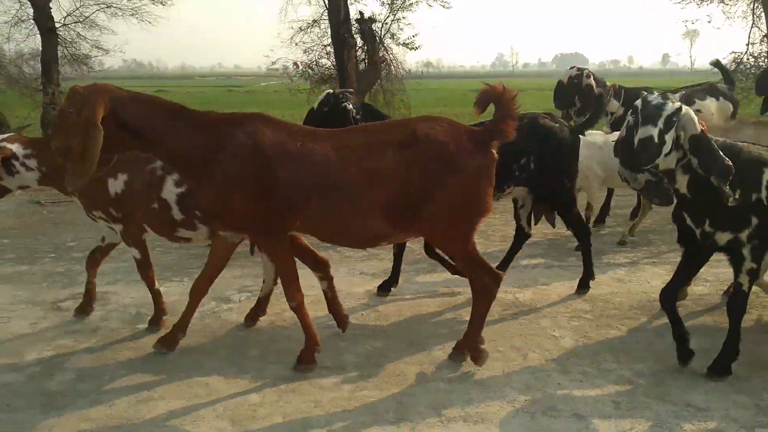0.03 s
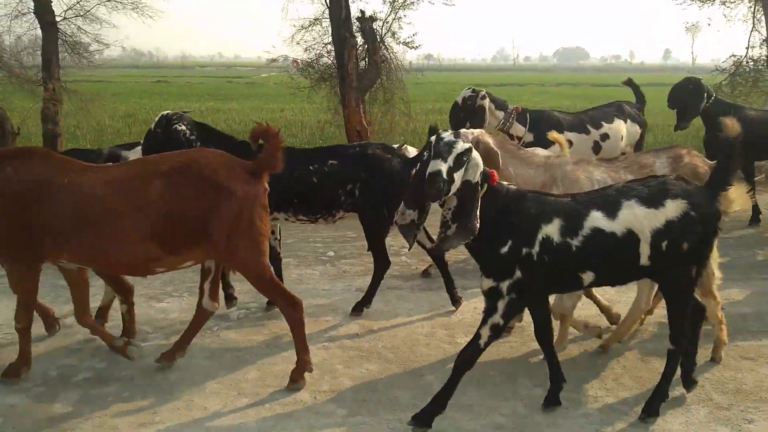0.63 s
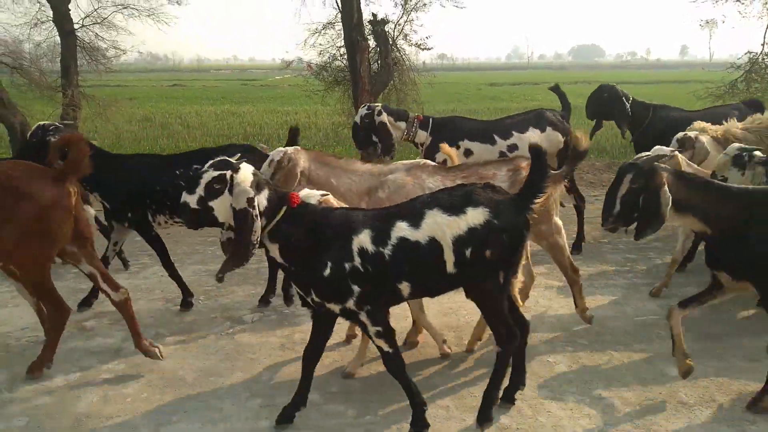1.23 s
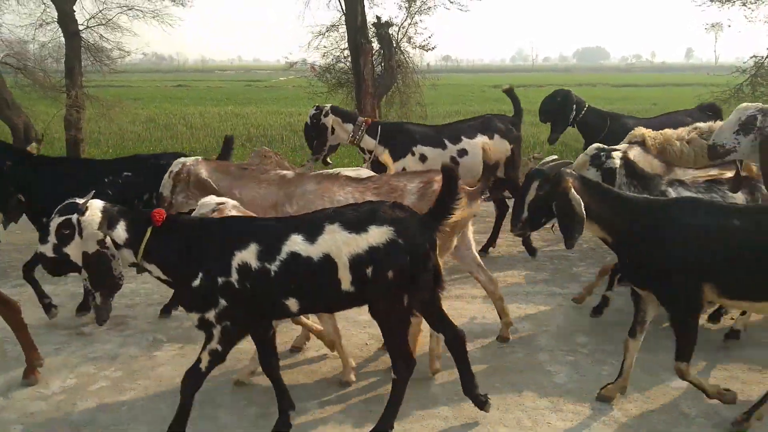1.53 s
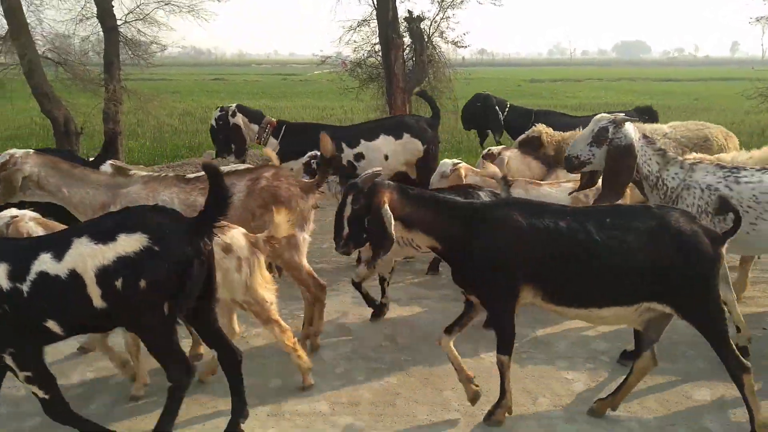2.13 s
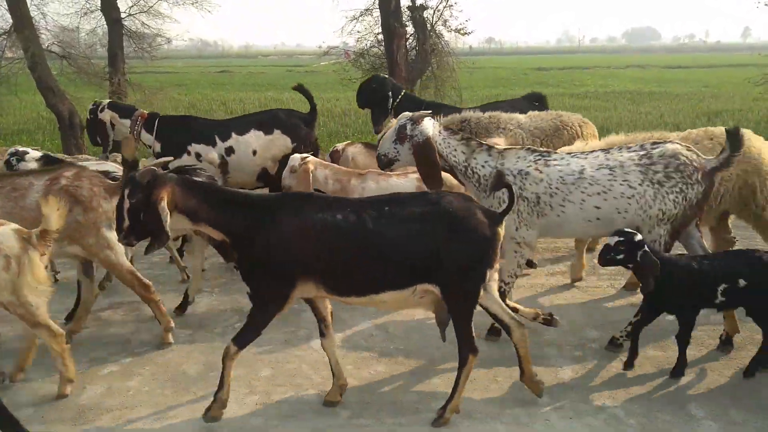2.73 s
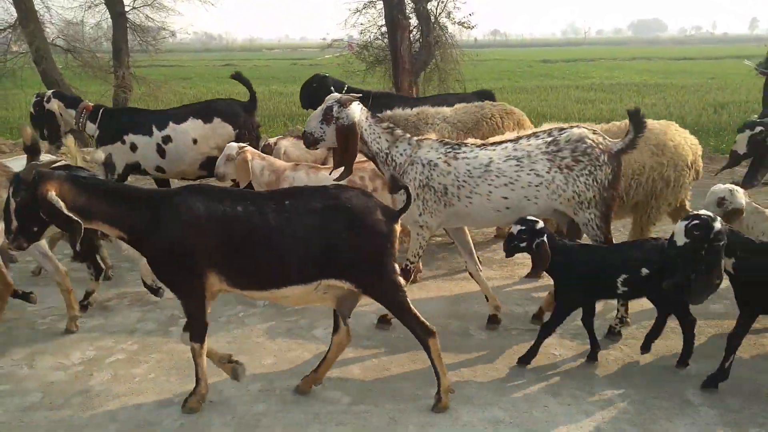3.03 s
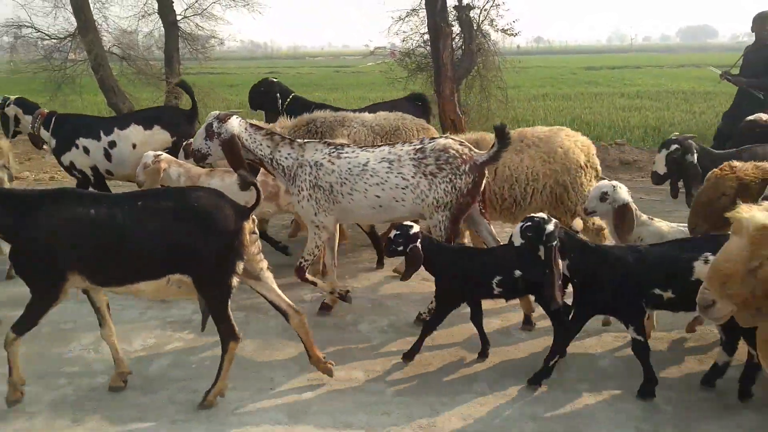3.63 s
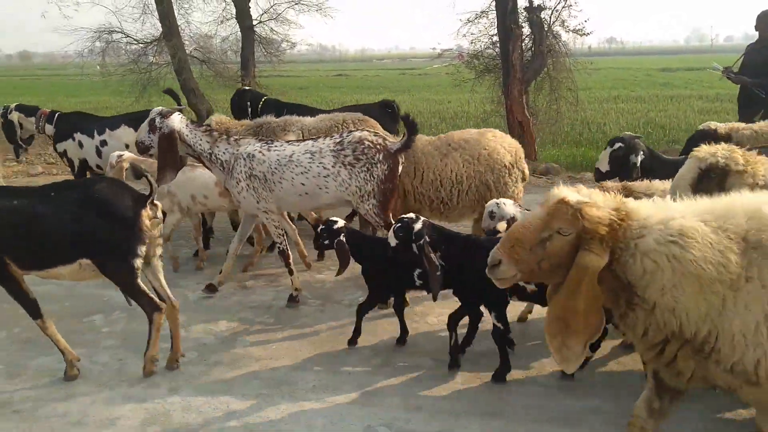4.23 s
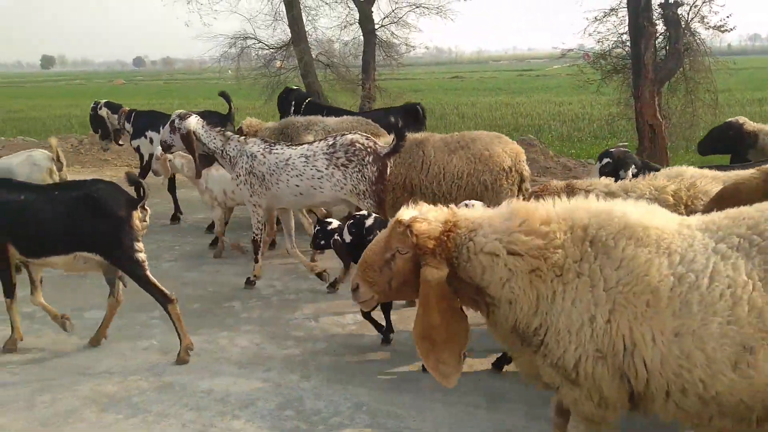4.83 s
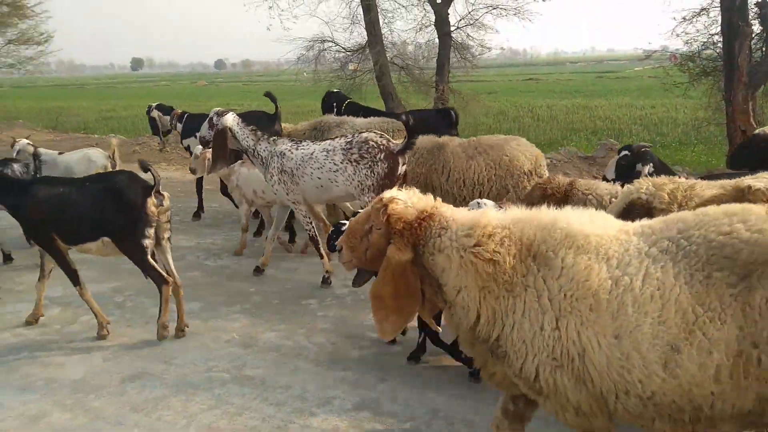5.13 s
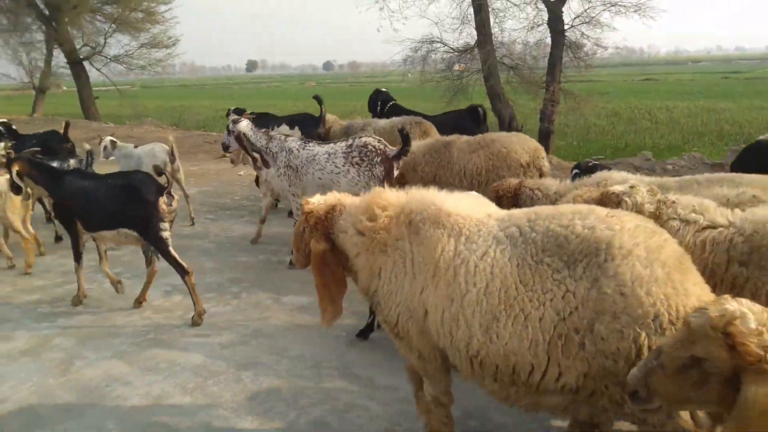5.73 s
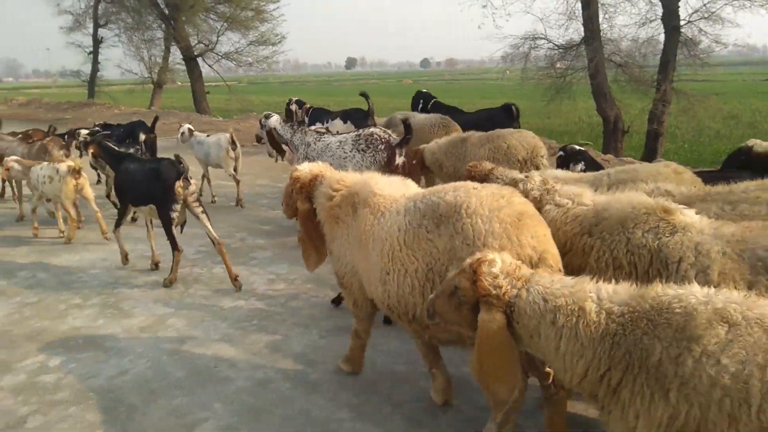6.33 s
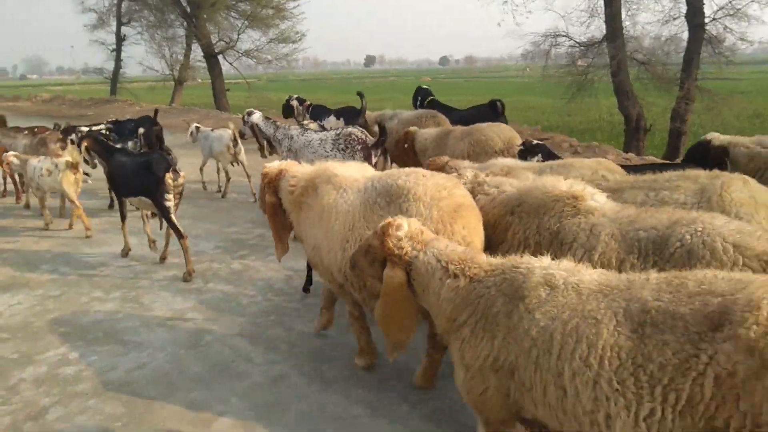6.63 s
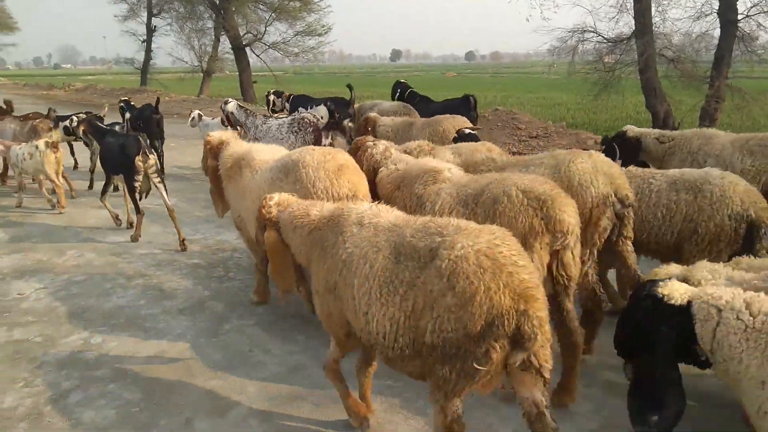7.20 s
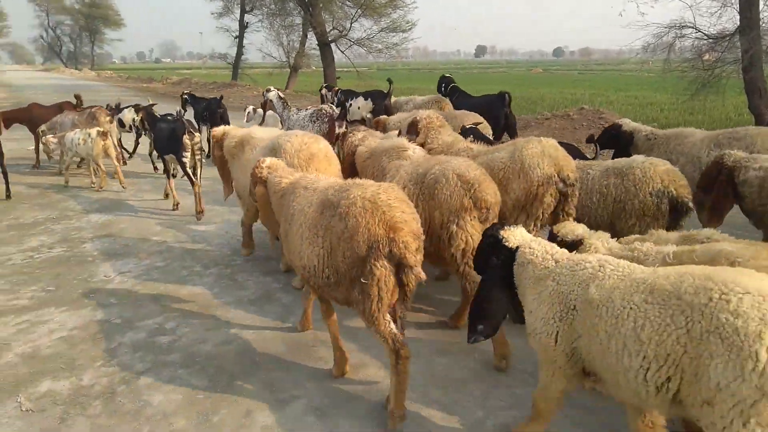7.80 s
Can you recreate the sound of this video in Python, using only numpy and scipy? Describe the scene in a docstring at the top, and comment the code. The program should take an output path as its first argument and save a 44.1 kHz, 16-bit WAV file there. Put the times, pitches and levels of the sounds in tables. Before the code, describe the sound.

Small collar bells clack and jingle as goats and sheep walk past on a gritty road, with strong wind buffeting the microphone later.

```python
"""Three pellet bells clack and ring on the collars of goats and sheep passing on a gritty paved road.
Each pellet hit rings the shell; in the large and small bells it also pumps the enclosed air: a clack.
Hooves tick, scuff and drag through the dust. Wind eddies buffet two microphone ports, the right one
muffled; from 5 s the breeze blows straight into the left. A faint, far whistle near the end."""
import sys
import numpy as np
from scipy import signal
from scipy.fft import rfft, irfft
from scipy.io import wavfile
from scipy.ndimage import uniform_filter1d

SR = 44100
rng = np.random.default_rng(int(sys.argv[2]) if len(sys.argv) > 2 else 0)


def output_pcm(signal):
    """Save a mono or channel-first signal as 16-bit PCM at the path in sys.argv[1].

    Samples are clipped to [-1, 1] before scaling.
    """
    pcm = np.clip(np.atleast_2d(signal).T, -1, 1) * 32767
    wavfile.write(sys.argv[1], SR, np.round(pcm).astype(np.int16))


N = 351036
TIME = np.arange(N) / SR

# Table levels are relative; the functions add their own gains.
# large bell, pellet hits: t/s, clack/dB, ring/dB, overtones/dB
LARGE_HITS = [(0.325, -50, -82, -90), (0.553, -40, -59, -58.5), (0.721, -65, -58, -60.5),
              (0.838, -37, -61, -61), (1.053, -46, -55, -60), (1.44, -40.5, -68, -63),
              (1.646, -37, -68, -72), (1.913, -43, -49.5, -66), (2.024, -39.5, -63, -67),
              (2.125, -35.5, -58, -64), (2.257, -23.5, -55, -61), (2.393, -31.5, -41.5, -63),
              (2.985, -30.5, -80, -71), (3.086, -32, -65, -66), (3.235, -50, -55, -70),
              (3.375, -43, -50, -67), (3.454, -36, -50, -53), (3.541, -46, -73, -56),
              (3.649, -36.5, -66, -63), (3.799, -38, -70, -86), (3.888, -32, -57, -61),
              (4.039, -51, -41.5, -64), (4.189, -36, -47.5, -61), (4.253, -52, -57.5, -55),
              (4.378, -45, -66, -56), (4.585, -38.5, -56, -67), (4.685, -36, -53.5, -82),
              (4.822, -35, -59.5, -60), (4.981, -32, -59, -67), (5.069, -64, -53, -85),
              (5.427, -43, -49, -68), (5.484, -29, -54, -55), (5.564, -45, -61, -60),
              (5.647, -51, -51.5, -92), (5.732, -46, -58, -76), (5.868, -40, -80, -65),
              (6.211, -34.5, -58, -79), (6.299, -27, -63, -55), (6.416, -37, -55.5, -83),
              (6.497, -43.5, -76, -82), (6.613, -40, -52.5, -64), (6.995, -29.5, -60.5, -70),
              (7.066, -32.5, -73, -52), (7.201, -47.5, -71, -74), (7.435, -39.5, -82, -62),
              (7.478, -44, -59, -58), (7.636, -33.5, -57.5, -58), (7.746, -48, -73, -84)]
# middle bell, pellet hits: t/s, ring/dB, overtones/dB
MIDDLE_HITS = [(0.914, -59, -72), (1.645, -61, -59), (2.893, -55, -71), (3.003, -71, -64),
               (3.294, -66, -61), (3.573, -50, -61), (3.72, -52, -69), (3.827, -59, -63), (4.128, -64, -62),
               (4.419, -60, -62), (4.5, -68, -67), (4.733, -58, -66), (5.05, -52, -61), (5.329, -60, -56),
               (5.365, -68, -62), (5.484, -55, -65), (5.603, -61, -53), (6.237, -59, -61),
               (6.523, -64, -63), (6.845, -50, -65), (7.719, -57, -65)]
# small bell, pellet hits: t/s, clack/dB, ring/dB
SMALL_HITS = [(0.181, -53, -59.5), (0.382, -36, -81), (0.444, -38.5, -56), (0.668, -48, -70),
              (0.83, -54, -45), (0.895, -48, -64), (0.971, -41.5, -74), (1.073, -43, -68),
              (1.266, -35, -45.5), (1.562, -52, -72), (1.71, -40, -53.5), (1.791, -42.5, -65),
              (1.853, -31.5, -67), (1.966, -47, -61), (2.123, -39, -46.5), (2.277, -54, -53),
              (2.403, -47, -54.5), (2.542, -46, -47.5), (2.653, -65, -54.5), (2.717, -49, -61),
              (2.821, -41, -77), (2.951, -65, -53), (7.702, -56, -58), (7.84, -42.5, -50)]
# shell modes, lowest first: f/Hz, level/dB, t60/s
LARGE_SHELL = [(3185, 0, .124), (7300, -9, .09), (8150, -7, .11), (8765, -2, .13), (9400, -3, .12),
               (11890, -6, .12), (14222, -3, .11), (14620, -4, .11)]
MIDDLE_SHELL = [(4202, 0, .16), (6150, -4, .07), (8606, -2, .09), (9445, -9, .1), (10349, -14, .08),
                (11680, -20, .09), (13658, -17, .1), (13951, -7, .08), (14560, -2, .055)]
SMALL_SHELL = [(4393, 0, .18), (8151, -2, .22), (11590, -7, .09), (13660, -8, .11)]

# hoof tips on grit: t/s, tick/dB, knock/dB
HOOF_HITS = [(0.094, -63, -80), (0.212, -56.5, -82), (0.556, -54, -68), (0.652, -52.5, -61),
             (0.667, -51.5, -74), (0.837, -55, -80), (1.049, -50.5, -81), (1.07, -53, -71),
             (1.407, -55.5, -72), (1.491, -50, -63.5), (1.564, -55, -66.5), (1.988, -63, -57.5),
             (2.0116, -47, -67), (2.127, -61, -55), (2.182, -57, -78), (2.294, -53.5, -76),
             (2.339, -56.5, -61.5), (2.5316, -42.5, -59), (2.8784, -57, -59.5), (2.977, -57, -73),
             (3.528, -50.5, -71), (3.5425, -56, -61), (4.001, -60, -73), (4.254, -71, -58),
             (4.3299, -70, -58.5), (4.5292, -67, -56), (4.562, -55, -61), (4.6996, -63, -57),
             (4.788, -74, -58.5), (5.114, -54, -63), (5.416, -56, -68), (5.517, -53, -58),
             (5.634, -53, -67), (5.672, -56, -65), (5.9, -49, -67), (6.537, -56, -54), (6.999, -52.5, -62),
             (7.046, -49.5, -71), (7.306, -52, -49), (7.772, -54, -66), (7.8378, -48.5, -56),
             (7.8743, -53, -65)]
# dragged hooves: centre t/s, sand/dB, dust/dB
HOOF_DRAGS = [(0.029, -52, -80), (.58, -53, -76), (1.51, -78, -60), (1.67, -51, -66), (2.53, -75, -59),
              (3.53, -55.5, -70), (3.86, -70, -60), (4.32, -48, -77), (4.41, -58, -53), (4.72, -55, -60),
              (4.81, -57, -56), (5.14, -54, -56), (5.82, -53.5, -59), (6.21, -52.5, -64),
              (6.675, -47.5, -52.5), (6.92, -58.5, -66), (7.13, -60, -54), (7.3, -59, -63),
              (7.441, -54, -65), (7.79, -59, -57.5)]
# soles rubbing the paving: centre t/s, level/dB
SOLE_SCRAPES = [(.06, -58.5), (2.78, -54), (3.17, -57), (3.7, -64), (4.29, -57), (4.55, -53.5)]
# shuffling, growing as more animals draw level: t/s, sand/dB, scrape/dB
HERD_SHUFFLE = [(0.0, -62.5, -64), (1.6, -60, -60.5), (3.0, -56, -59.5), (4.4, -56.5, -56),
                (5.4, -56.5, -61.5), (7.96, -55.5, -58.5)]
# spectra of grit, hoof knock and fine dust: f/Hz, gain/dB
GRIT_EQ = [(2600, -36), (3300, 1), (4200, 4.5), (4900, 8.5), (5400, 6.5), (6200, -1.5), (7400, -9.5),
           (9000, -13.5), (10500, -34), (15000, -44.5)]
KNOCK_EQ = [(150, 17), (400, 16), (900, 11), (1450, 13), (2100, 11), (2800, 5), (4000, -45), (8000, -53.5)]
DUST_EQ = [(3000, -25), (5200, 7.5), (7500, -8), (9000, -2), (10800, -16), (12500, -9.5), (14000, -20),
           (15500, -21)]

# breeze between gusts: t/s, left/dB, right/dB
PORT_BREEZE = [(0.0, -58, -54.5), (1.2, -48, -51.5), (2.0, -49, -63), (2.9, -60, -72), (3.8, -64, -51.5),
               (4.98, -48, -60), (5.08, -24.5, -62), (5.5, -29, -46.5), (5.7, -21.5, -38), (5.79, -25, -40),
               (6.1, -26.5, -42), (6.75, -24, -39.5), (7.96, -33, -41.5)]
# gusts: start t/s, length/s, left/dB, right/dB
PORT_GUSTS = [(0.0, 0.0066, -39, -41.5), (0.144, 0.06, -34, -38), (0.24, 0.09, -62, -44.5),
              (0.344, 0.15, -62, -48), (0.627, 0.026, -38.5, -68), (0.745, 0.082, -37, -62),
              (0.877, 0.082, -52, -38.5), (1.033, 0.098, -45.5, -49), (1.198, 0.042, -34.5, -44),
              (1.43, 0.013, -34.5, -47), (1.605, 0.045, -43, -46), (1.933, 0.071, -44.5, -75),
              (2.115, 0.063, -34.5, -61), (2.214, 0.024, -29, -71), (2.293, 0.015, -36.5, -48),
              (2.385, 0.068, -50, -48.5), (2.509, 0.013, -39, -54), (2.571, 0.17, -42.5, -54),
              (3.008, 0.1, -41.5, -47), (3.145, 0.076, -41.5, -58), (3.255, 0.079, -46.5, -51),
              (3.418, 0.17, -48.5, -53), (3.747, 0.17, -63, -37.5), (3.904, 0.23, -48.5, -46.5),
              (4.128, 0.057, -63, -39.5), (4.256, 0.23, -65, -43), (4.524, 0.1, -63, -52),
              (4.642, 0.1, -48.5, -64), (4.791, 0.087, -51, -43), (5.006, 0.051, -55, -45.5),
              (5.129, 0.1, -19.5, -73), (5.337, 0.023, -19.5, -55), (5.404, 0.34, -18.5, -62),
              (5.821, 0.15, -19, -46), (6.159, 0.051, -18.5, -60), (6.237, 0.42, -18, -45),
              (6.761, .005, -29, -50), (6.799, 0.004, -23, -51), (6.855, 0.11, -18, -52),
              (7.032, 0.22, -18.5, -38.5), (7.294, 0.13, -17.5, -47), (7.464, 0.16, -15.5, -38),
              (7.686, 0.0065, -18.5, -48), (7.77, 0.18, -23, -57)]
# single eddies on the left port: t/s, level/dB
EDDY_SLAPS = [(5.205, -21), (5.414, -20), (5.512, -10.5), (5.566, -20), (5.636, -25), (5.713, -15.5),
              (5.957, -8), (6.168, -27), (6.273, -14.5), (6.305, -12.5), (6.346, -22), (6.508, -17),
              (6.572, -16), (6.597, -10.5), (6.65, -18.5), (6.854, -9.5), (7.059, -15), (7.109, -12),
              (7.147, -18), (7.194, -13.5), (7.228, -17), (7.355, -17), (7.462, -18), (7.636, -17.5),
              (7.779, -26.5), (7.837, -28)]
# spectrum of flow tearing at the port rim: f/Hz, gain/dB
FLUTTER_EQ = [(250, -8), (550, 2.5), (900, -15), (1300, -20.5), (2000, -24), (3000, -27), (5000, -50.5)]
# muffled right port against the left: f/Hz, gain/dB
RIGHT_PORT_EQ = [(300, -14.5), (900, -19), (1300, -20.5), (2600, -17.5), (3200, -11), (3650, -11),
                 (4300, -27), (5100, -43.5), (6200, -28), (8600, -20), (14000, -8)]
# far whistle: t/s, f/Hz, level/dB
WHISTLE_ARC = [(7.61, 2310, -78), (7.68, 2410, -66), (7.74, 2435, -64.5), (7.82, 2415, -65),
               (7.96, 2365, -67)]


def large_bell():
    """Loud, hollow clack over a ringing shell."""
    hits = [(s, low_db, high_db) for s, _, low_db, high_db in LARGE_HITS]
    shell = ring(LARGE_SHELL, hits, ring_db=14, overtone_db=-.5, scatter_db=7, rattle_db=-2.5,
                 detune=.00097)
    return shell + clacks(LARGE_HITS, air_hz=3481, clack_db=4, swell_s=.0034)


def middle_bell():
    """Clear ring, bright overtones, no clack."""
    return ring(MIDDLE_SHELL, MIDDLE_HITS, ring_db=11, overtone_db=12.5, scatter_db=9, rattle_db=-5,
                detune=.0027)


def small_bell():
    """Higher, shorter clack; overtones follow the ring level."""
    hits = [(s, db, db) for s, _, db in SMALL_HITS]
    shell = ring(SMALL_SHELL, hits, ring_db=6.5, overtone_db=-6, scatter_db=5.5, rattle_db=-6,
                 detune=.0016)
    return shell + clacks(SMALL_HITS, air_hz=3704, clack_db=2.5, swell_s=.0022)


def ring(modes, hits, ring_db, overtone_db, scatter_db, rattle_db, detune,
         mean_gap_s=.014, fade_db_per_s=260, contact_s=.0015, click_db=-13, click_s=.00065):
    """A pellet clicks on the shell and bounces twice; each contact weights the modes differently."""
    out, t = np.zeros(N), TIME[:SR // 7]
    hz, mode_db, t60_s = np.transpose(modes)
    attack = 1 - np.exp(-t / contact_s)
    for s, low_db, high_db in hits:
        for delay_s in [0, *np.cumsum(rng.exponential(mean_gap_s, size=2))]:
            scatter = np.clip(rng.standard_normal(len(hz)), -2, 1)
            gains = undb(mode_db + high_db + overtone_db + scatter_db * scatter)
            # light bounces hardly move the lowest mode
            gains[0] = undb(low_db + ring_db + (rattle_db - 4.5 if delay_s else 0))
            pulled_hz = hz * (1 + detune * rng.standard_normal(len(hz)))  # pellet loads the shell
            click = np.diff(rng.standard_normal(len(t) + 1)) * np.exp(-t / click_s)
            click *= undb(high_db + overtone_db + click_db)
            force = undb(rattle_db - fade_db_per_s * delay_s) if delay_s else 1
            add(out, s + delay_s, force * (click + gains @ partials(pulled_hz, t60_s, t) * attack))
    return out


def partials(hz, t60_s, t, split_hz=150, twin_gain=.6, damping_db=2.5):
    """Out-of-round shell: each overtone beats with a twin; the swinging collar varies its damping."""
    split, damping = rng.standard_normal((2, len(hz), 1))
    split[0] = damping[0] = 0  # lowest mode rings clean
    phase = 2 * np.pi * hz[:, None] * t
    pair = np.sin(phase) + twin_gain * np.sin(phase + 2 * np.pi * split_hz * split * t)
    decay = np.exp(-np.log(1000) * t / (t60_s[:, None] * undb(damping_db * damping)))
    return pair / (1 + twin_gain) * decay


def clacks(hits, air_hz, clack_db, swell_s, detune=.015, rolls_per_s=7, rebound_db=-21, rebound_s=.022):
    """A hit pumps the air in the shell; a faint, detuned clack follows as the pellet falls back."""
    out, t = np.zeros(N), TIME[:SR // 12]
    rolls = [(s, -51 - 8 * soft) for s, soft in random_events(rolls_per_s)]  # rolling pellet taps
    for s, db, *_ in list(hits) + rolls:
        for bounce in range(2):
            age = t / (swell_s * undb(rng.standard_normal() - 2 * bounce))
            hz = air_hz * (1 + detune * (.5 + bounce) * rng.standard_normal())
            swell = (age * np.exp(1 - age)) ** 1.1
            add(out, s, undb(db + clack_db + bounce * rebound_db) * swell * np.sin(2 * np.pi * hz * t))
            s += rebound_s * (.5 + rng.random())
    return out


def hoof_ticks(tick_s=.0016, knock_s=.007, crumble_db=-19, crumble_s=.01, stone_hz=5400):
    """A hoof tip cracks grit, each bit at its own pitch; the hoof knocks, crumbs skitter on."""
    ticks, knocks, t = np.zeros(N), np.zeros(N), TIME[:SR // 16]
    far_steps = [(s, -62 - 8 * far, -70 - 8 * far) for s, far in random_events(per_s=18)]
    for s, tick_db, knock_db in HOOF_HITS + far_steps:
        crack, thud = rng.standard_normal((2, len(t)))
        hz = stone_hz * undb(1.5 * rng.standard_normal())
        crack *= np.exp(-t / tick_s) + undb(crumble_db) * np.exp(-t / crumble_s)
        add(ticks, s, undb(tick_db + 8) * (crack + 2 * resonate(crack, hz, q=7)))
        add(knocks, s, undb(knock_db + 3) * thud * np.exp(-t / knock_s))
    return 2 * (colour(ticks, GRIT_EQ) + colour(knocks, KNOCK_EQ))


def hoof_drags(half_width_s=.034):
    """A dragged hoof grinds sand and scatters fine specks; each speck size pings at its own pitch."""
    sand_gain = sum(undb(db) * press(s, half_width_s) for s, db, _ in HOOF_DRAGS)
    dust_gain = sum(undb(db - 1) * press(s, half_width_s) for s, _, db in HOOF_DRAGS)
    sand = colour(grains(per_s=7500, spread_db=4), GRIT_EQ)
    specks = sum(resonate(grains(per_s=450, spread_db=2.5), hz, q=14)
                 for hz in np.geomspace(4500, 14000, 9))
    return sand_gain * unit(sand) + dust_gain * unit(colour(specks, DUST_EQ))


def sole_scrapes(half_width_s=.018):
    """A sole slides as it takes the weight: a short, dull rasp."""
    gain = sum(undb(db) * press(s, half_width_s) for s, db in SOLE_SCRAPES)
    return gain * unit(colour(grains(per_s=2100, spread_db=0), KNOCK_EQ))


def shuffle(steps_per_s=65, step_s=.007, depth=1.4):
    """Many small steps press bursts of grains from the dust; soles rub on more smoothly."""
    steps = (rng.random(N) < steps_per_s / SR) * rng.random(N)
    pressure = 1 + depth * unit(signal.lfilter([1], [1, -np.exp(-1 / (step_s * SR))], steps))
    sand = colour(pressure * grains(per_s=4800, spread_db=.5), GRIT_EQ)
    scrape = colour(np.sqrt(pressure) * grains(per_s=4500, spread_db=2), KNOCK_EQ)
    return (steady(sand, span_s=.11) * undb(curve(HERD_SHUFFLE, 1) + 1)
            + steady(scrape, span_s=.11) * undb(curve(HERD_SHUFFLE, 2) - 1))


def grains(per_s, spread_db):
    """Sand grains crack at random; most tiny, a few loud."""
    sizes = undb(spread_db * np.minimum(rng.exponential(size=N), 5))
    return unit((rng.random(N) < per_s / SR) * sizes * rng.standard_normal(N))


def press(centre_s, half_width_s):
    """Gaussian rise and fall of a hoof's load."""
    return np.exp(-np.minimum(((TIME - centre_s) / half_width_s) ** 2, 20))


def wind():
    """Separate turbulence at each port; the sharpest eddies slap the left."""
    slaps = np.zeros(N)
    for s, db in EDDY_SLAPS:
        add(slaps, s - .01, undb(db + 2) * eddy(width_s=.00044, turn=rng.random()))
    left = buffet(wind_db(port=1) + 1.02, eddies_per_s=430, quickening=.45, spread=.39)
    right = buffet(wind_db(port=2) + 1, eddies_per_s=480, quickening=.25, spread=.44)
    return np.array([left + flutter(left) + slaps, right])


def wind_db(port, edge_s=.015):
    """Level at port 1 (left) or 2 (right): gusts swell, hold and die on top of the breeze."""
    power = undb(curve(PORT_BREEZE, port)) ** 2
    for start_s, length_s, *port_db in PORT_GUSTS:
        outside_s = np.maximum(start_s - TIME, TIME - start_s - length_s)
        power += (undb(port_db[port - 1]) * np.exp(-np.clip(outside_s / edge_s, 0, 20))) ** 2
    return 10 * np.log10(power)


def buffet(level_db, eddies_per_s, quickening, spread, base_width_s=.0017):
    """Eddies cross a port at random; stronger wind sweeps them past faster, so brighter."""
    out, pool = np.zeros(N), N // 8
    times_s = rng.random(pool)[:int(eddies_per_s * N / SR)] * TIME[-1]
    turns = rng.random(pool)
    stretches = np.exp(spread * np.clip(rng.standard_normal(pool), -1.7, 1.7))
    widths_s = base_width_s * undb(-quickening * (level_db[(times_s * SR).astype(int)] + 20))
    for s, width_s, turn, stretch in zip(times_s, widths_s, turns, stretches):
        add(out, s - .01, eddy(width_s * stretch, turn))
    return steady(low_cut(out), span_s=.052) * undb(level_db)


def eddy(width_s, turn):
    """Pressure push and pull in a 20 ms window; turn (0-1) is the eddy's orientation."""
    t = np.arange(-SR // 100, SR // 100) / SR
    return np.hanning(len(t)) * (np.exp(2j * np.pi * turn) / (1 - 1j * t / width_s) ** 2).real


def flutter(pressure, gain_db=-13.5, ref_pressure=.34):
    """Flow tears at the port rim: rough noise surging with pressure squared."""
    surge = np.minimum((pressure / ref_pressure) ** 2, 2) / 2
    return undb(gain_db) * ref_pressure * surge * unit(colour(rng.standard_normal(N), FLUTTER_EQ))


def whistle():
    """One faint arching note, perhaps a far bird."""
    phase = 2 * np.pi * np.cumsum(curve(WHISTLE_ARC, 1)) / SR
    return (TIME > WHISTLE_ARC[0][0]) * undb(curve(WHISTLE_ARC, 2)) * np.sin(phase)


def undb(db):
    """dB to gain."""
    return 10 ** (np.asarray(db) / 20)


def curve(rows, column):
    """Table column, linearly interpolated over time."""
    rows = np.array(rows)
    return np.interp(TIME, rows[:, 0], rows[:, column])


def unit(x):
    """Scale to rms 1."""
    return x / np.sqrt(np.mean(x ** 2))


def steady(x, span_s):
    """Hold rms near 1 over each span; faster detail stays."""
    return x / np.sqrt(uniform_filter1d(x ** 2, int(span_s * SR)) + 1e-12)


def add(track, s, sound):
    """Mix a sound in at s seconds."""
    start = max(int(s * SR), 0)
    track[start:start + len(sound)] += sound[:max(N - start, 0)]


def random_events(per_s):
    """Random rows: t/s, value (0-1)."""
    return [(when * N / SR, value) for when, value in rng.random((int(per_s * N / SR), 2))]


def resonate(x, hz, q):
    """Single resonant band-pass."""
    return signal.lfilter(*signal.iirpeak(hz, q, fs=SR), x)


def colour(x, eq, size=2048):
    """Minimum-phase filter from rows of f/Hz, gain/dB."""
    hz, db = np.transpose(eq)
    grid_hz = np.maximum(np.arange(size // 2 + 1) * SR / size, 1)
    gain = undb(np.interp(np.log(grid_hz), np.log(hz), db))
    cepstrum = irfft(np.log(gain))
    cepstrum[1:size // 2] *= 2
    cepstrum[size // 2 + 1:] = 0
    return signal.fftconvolve(x, irfft(np.exp(rfft(cepstrum))))[:N]


def low_cut(x, hz=63):
    """Shed the deepest rumble."""
    return signal.sosfilt(signal.butter(2, hz, "high", fs=SR, output="sos"), x)


def scene(right_lag_s=.000392):
    """Bells and hooves in open air at one clear and one muffled port, plus wind."""
    bells = large_bell() + middle_bell() + small_bell()
    shared = bells + hoof_ticks() + hoof_drags() + sole_scrapes() + whistle()
    # shuffling comes from all over the road: each port gets its own
    left = shared + shuffle()
    delayed = np.interp(TIME - right_lag_s, TIME, shared)
    right = colour(delayed + shuffle(), RIGHT_PORT_EQ)
    return np.array([left, right]) + wind()


def record(dry, ceiling=.5, top_hz=15450):
    """Soft-limit the largest gusts, then cut bottom and top."""
    rounded = dry / (1 + (dry / ceiling) ** 4) ** .25
    return signal.sosfilt(signal.ellip(8, .2, 70, top_hz, fs=SR, output="sos"), low_cut(rounded))


dry = scene()
out = record(dry)
output_pcm(out)
```